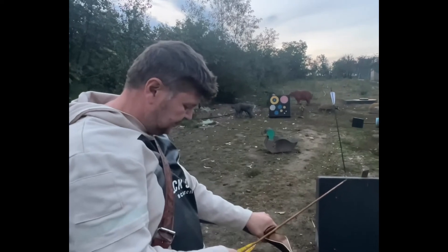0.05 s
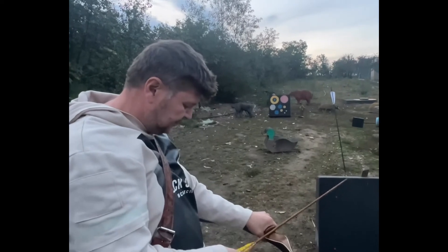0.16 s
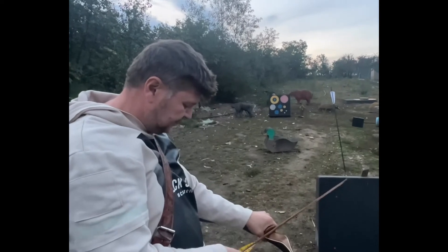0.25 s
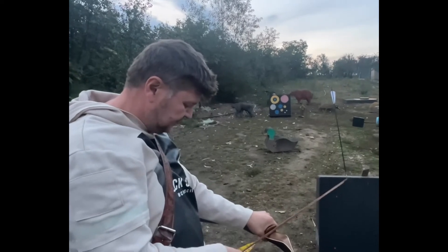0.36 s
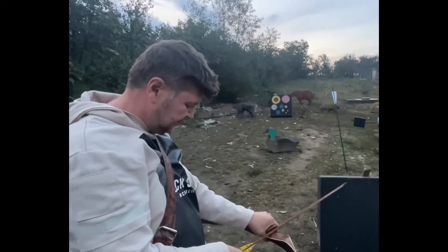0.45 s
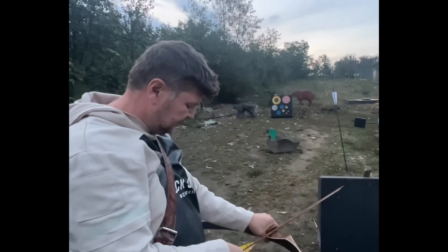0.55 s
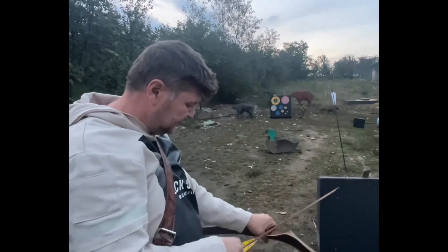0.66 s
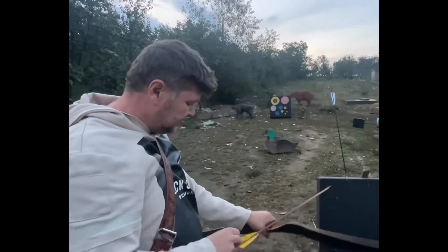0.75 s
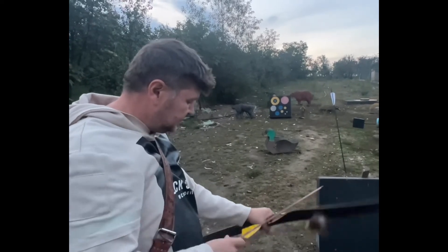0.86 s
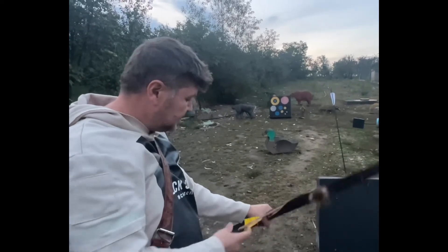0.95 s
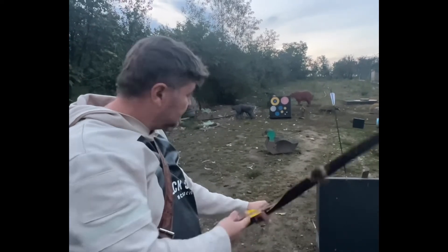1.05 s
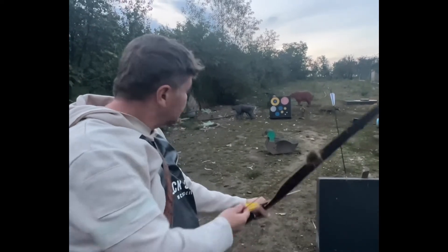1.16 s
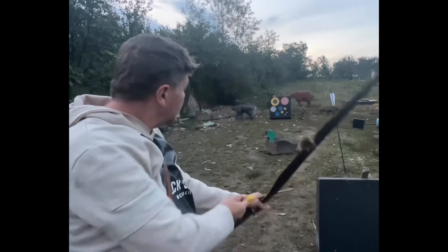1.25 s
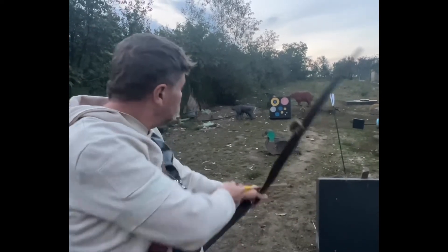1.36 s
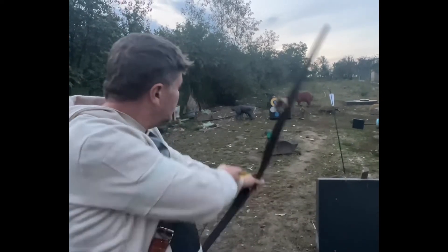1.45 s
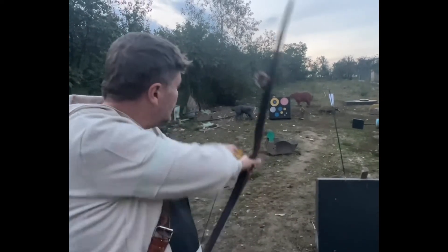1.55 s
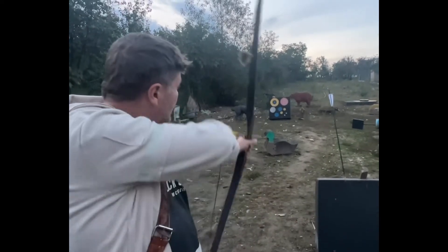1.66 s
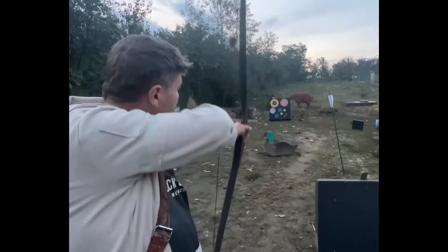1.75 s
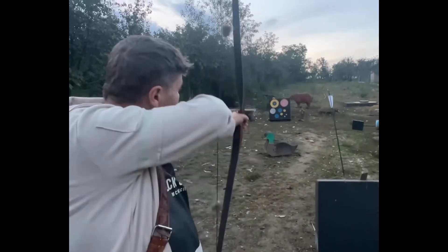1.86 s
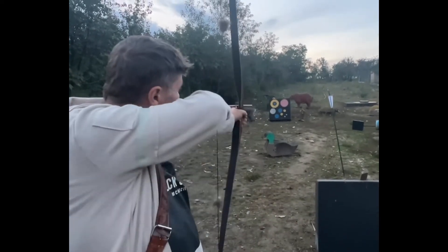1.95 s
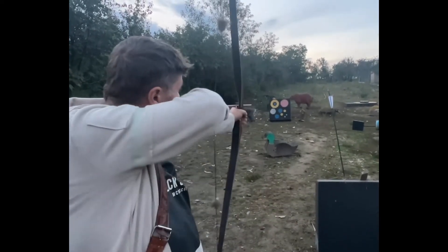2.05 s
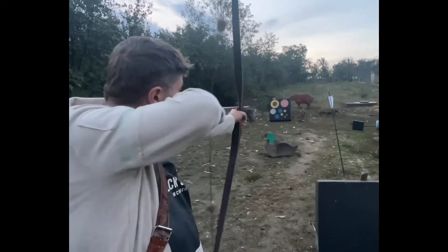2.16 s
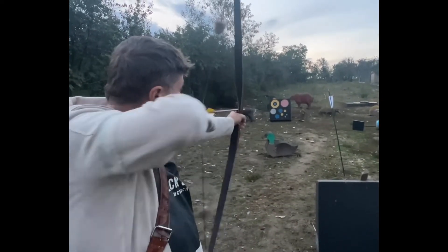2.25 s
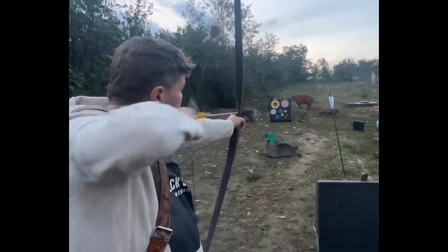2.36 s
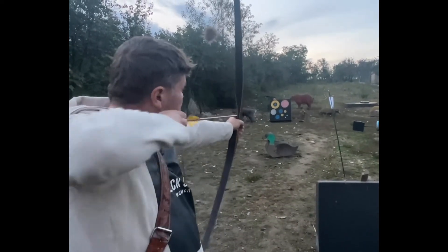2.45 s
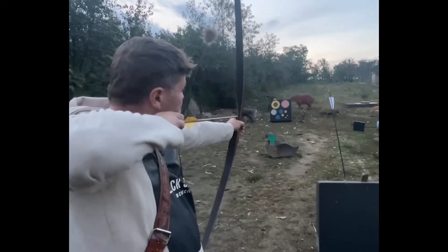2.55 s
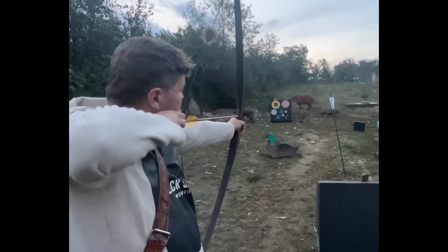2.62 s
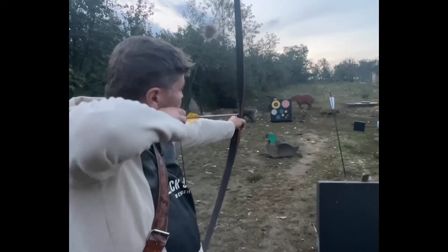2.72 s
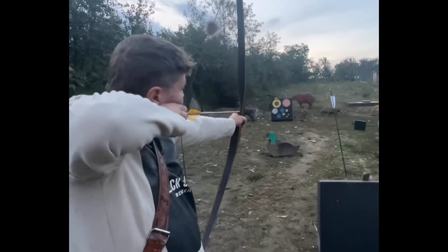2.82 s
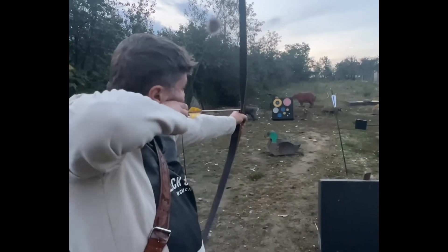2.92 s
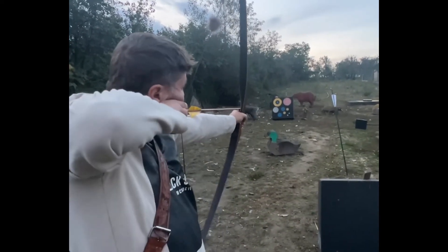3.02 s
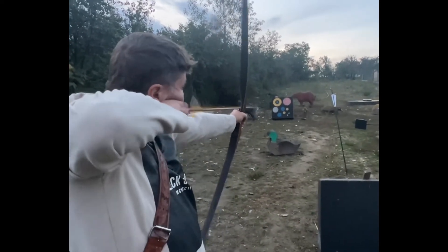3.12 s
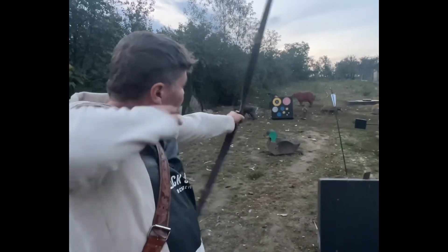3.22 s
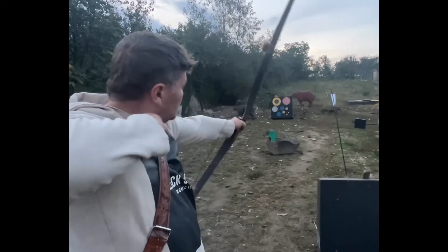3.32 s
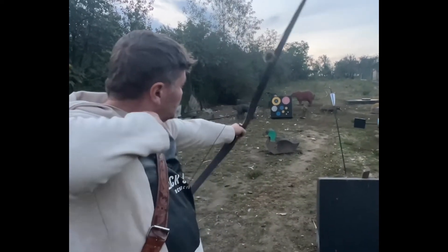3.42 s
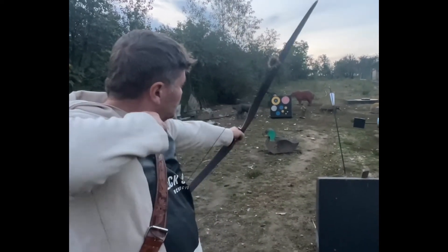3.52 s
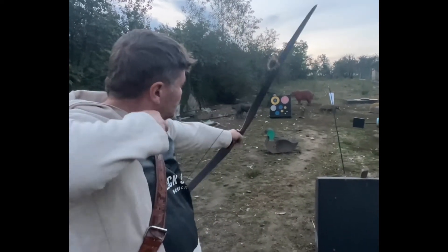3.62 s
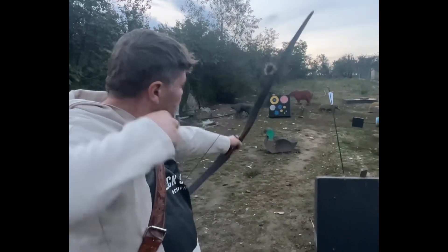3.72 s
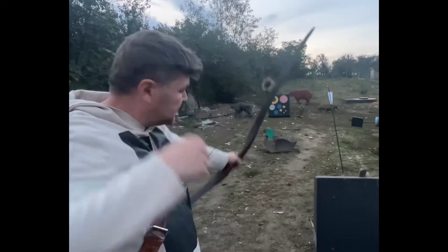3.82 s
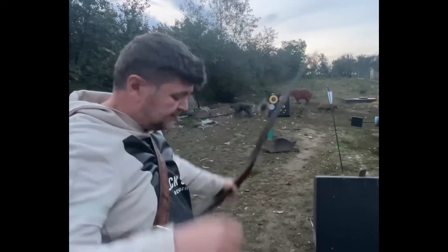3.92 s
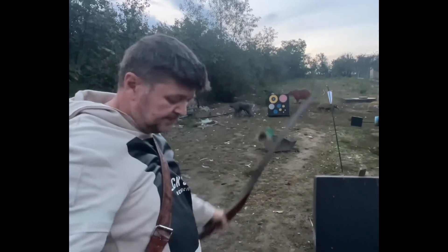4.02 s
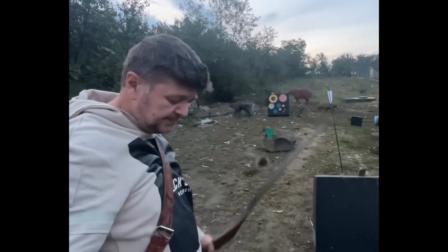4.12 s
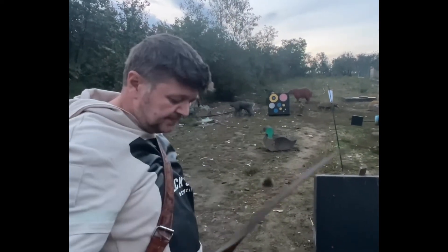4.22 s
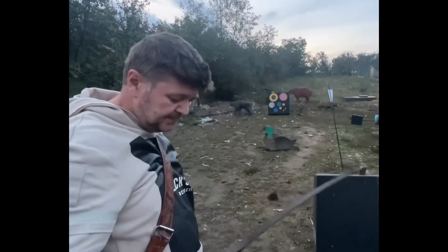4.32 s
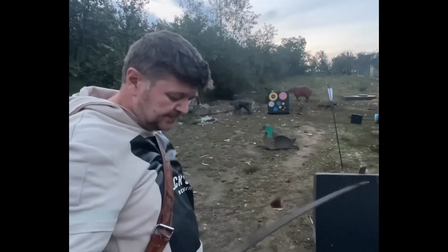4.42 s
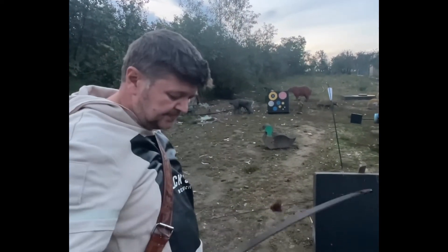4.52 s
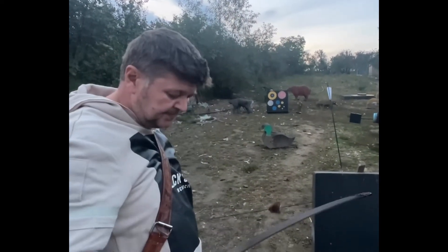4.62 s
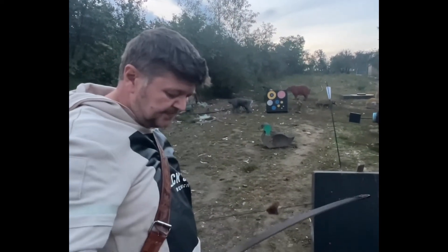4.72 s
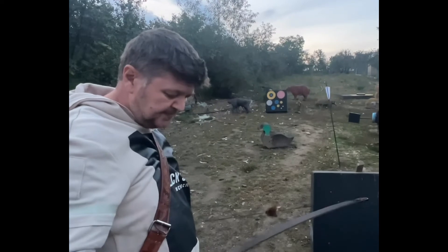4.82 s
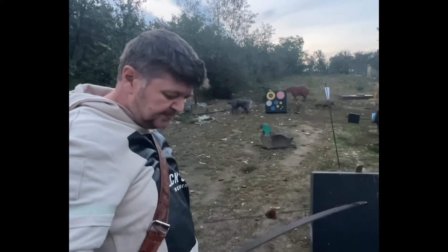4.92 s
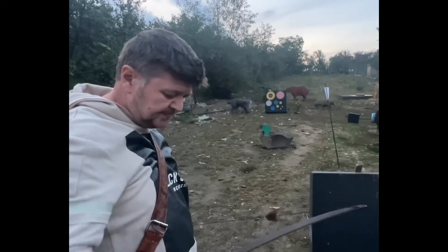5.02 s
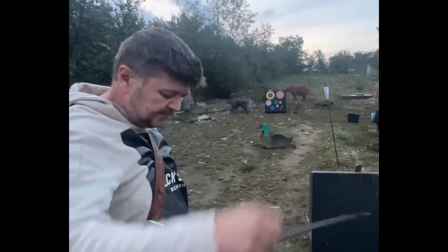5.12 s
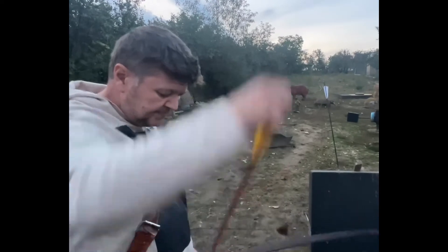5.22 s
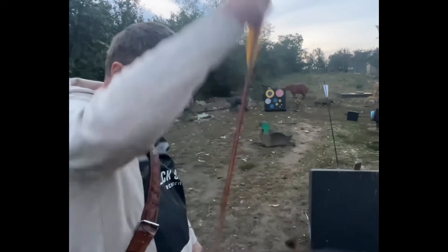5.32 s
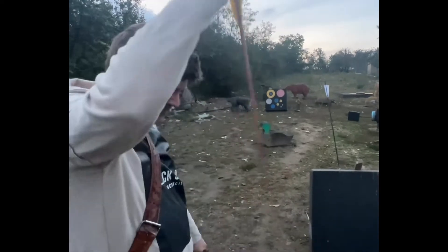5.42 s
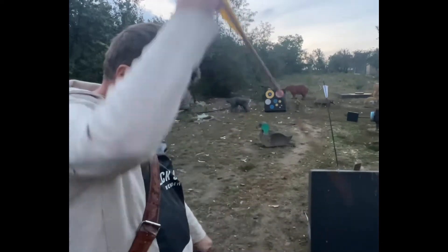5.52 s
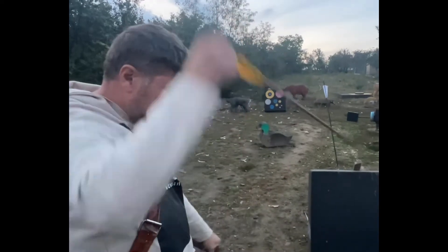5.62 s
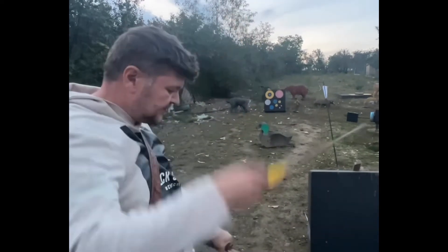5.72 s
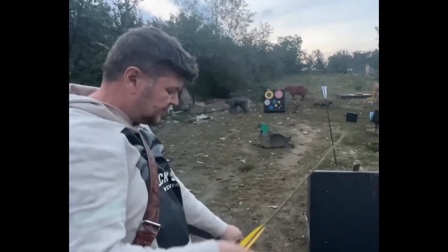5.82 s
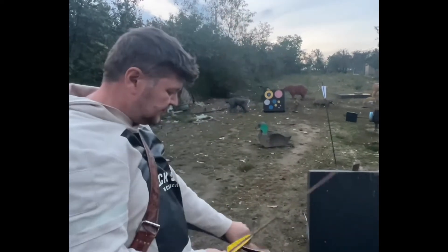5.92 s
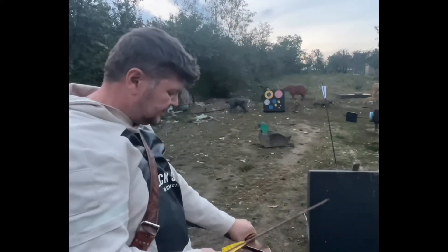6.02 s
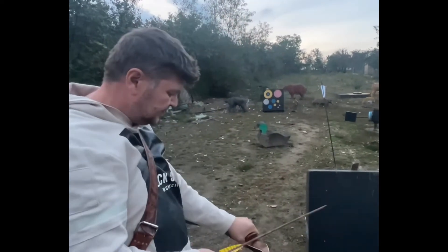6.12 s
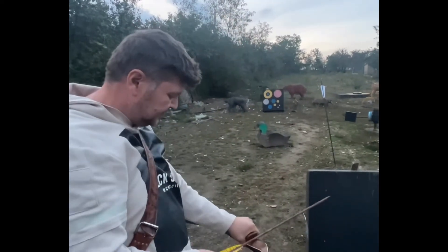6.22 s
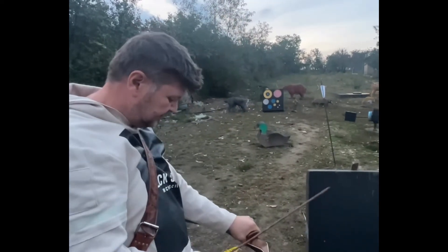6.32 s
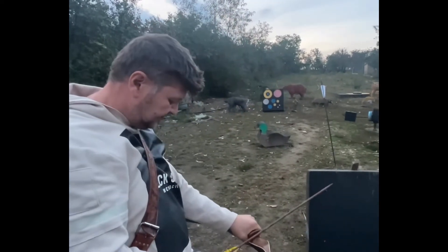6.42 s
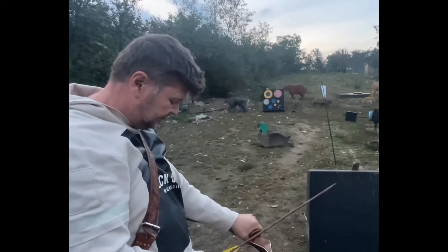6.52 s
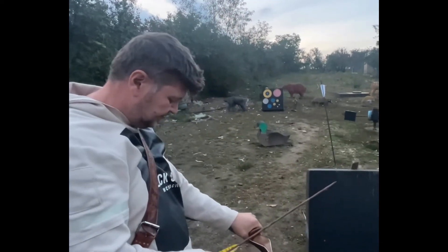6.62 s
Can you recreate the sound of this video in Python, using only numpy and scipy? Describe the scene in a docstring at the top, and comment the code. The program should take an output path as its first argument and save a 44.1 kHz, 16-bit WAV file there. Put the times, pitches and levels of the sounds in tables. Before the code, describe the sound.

One close bow shot twangs and the arrow smacks into a rattling target, then arrows clatter and scrape in a quiver.

```python
"""An open archery range at dusk, heard from just behind an archer who shoots one arrow.
The bed is rumbling wind, a far road, trilling crickets and a few faint hoots. Up close, shafts knock,
slide and jostle in the quiver. The string whistles through the air and stops with a jolt that rings
through the bow; a fifth of a second later the arrow slaps into the target and rattles its face."""
import sys
import numpy as np
from scipy import signal
from scipy.fft import rfft, irfft, next_fast_len
from scipy.io import wavfile

SR = 44100
rng = np.random.default_rng(int(sys.argv[2]) if len(sys.argv) > 2 else 0)


def store_wav(level_fs):
    """Save 16-bit WAV to argv[1]."""
    pcm = np.round(np.clip(np.atleast_2d(level_fs), -1, 1) * 32767)
    wavfile.write(sys.argv[1], SR, pcm.T.astype(np.int16))


N = 294144

# fader rides of the bed: (time [s], wind level [dB], road level [dB])
BED_LEVELS = [(0, -58.5, -58.5), (.5, -55.5, -59), (.85, -59, -58), (2.9, -61.5, -58), (4.5, -63.5, -56.5),
              (4.8, -57.5, -58), (5.0, -62, -58), (5.45, -62.5, -58), (5.56, -72.5, -60), (6.67, -75, -62)]
# stereo width of the bed: (frequency [Hz], left-right likeness [0-1])
BED_LIKENESS = [(60, 0.96), (200, 0.57), (400, 0.017), (15000, 0.13)]
# balance of the bed and of the foreground: (frequency [Hz], left minus right [dB])
BED_PAN = [(60, -1.5), (110, -2), (200, -5.5), (380, -4), (700, -0.5), (1290, 7.5), (2380, 9), (4400, 2),
           (8120, 11.5), (15000, -11)]
NEAR_PAN = [(80, 3.5), (200, -3), (400, -10.5), (1300, -3), (2400, -5.5), (4400, 2.5), (8000, -2)]
# phase on top of the left-right lag, at aside = 1: (frequency [Hz], left lead [rad])
LEFT_LEAD = [(40, -0.5), (125, 0.7), (250, 0.46), (500, 1.8), (1000, -0.6), (2000, 1.42), (3250, -1),
             (3800, 1.6), (6500, 3.4), (8000, 6.5), (12000, 8.5)]
# the microphone's treble lift: (frequency [Hz], gain [dB])
MIC_EQ = [(3000, -1.24), (8000, 6), (12000, 5.5), (15000, -5.5)]

# tone of each noise layer: (frequency [Hz], relative level [dB])
WIND_EQ = [(15, -30), (25, -24), (49, 3), (123, 0), (172, -8.5), (343, -15), (404, -11.5), (500, -24.5),
           (650, -30.5), (1100, -120)]
ROAD_EQ = [(88, -32), (150, 5.5), (165, -16), (234, -6.5), (556, -2.5), (883, -2), (991, -0.5), (1050, 2.5),
           (1270, 0.5), (1910, 6), (4460, -24.5), (7080, -21), (7640, -17), (8750, -34.5), (10800, -43.5),
           (12200, -29), (13500, -50)]
SCRAPE_EQ = [(2200, 0), (3200, -0.5), (4000, -0.5), (5000, -1), (6200, -7), (8500, -10), (10500, -18.5),
             (15000, -21)]  # shaft on shaft
HOLLOW_EQ = [(700, -6.5), (900, -2.5), (1100, -1), (1320, 3), (1500, 1.5), (1780, -8), (2100, 0),
             (2600, -6), (3000, -28), (3300, -30), (3700, -14)]  # scraping inside the quiver
CLOTH_EQ = [(150, -10), (280, -4), (500, -12), (850, -5)]
CRACK_EQ = [(150, -45), (500, -11.5), (1200, 13.5), (3000, 22), (5500, 19.5), (7000, 4.5), (9000, 1.5),
            (12000, -12), (15500, -28.5)]  # any hard contact
RATTLE_EQ = [(900, -21), (2450, 0), (5000, -4), (7400, -3.5), (10000, -11), (13000, -17), (15500, -4)]  # the target face
DISTANT_EQ = [(600, 1.5), (1500, 10), (3000, 3.5), (5500, -1), (9000, -15), (12000, -25.5)]  # dulled by distance
RUSH_EQ = [(300, 1.5), (650, 0.5), (1000, -3.5), (1400, -2.5), (2500, -5), (4000, -19), (6000, -26.5),
           (9000, -24), (13000, -32), (16000, -14)]  # the string cutting the air
WAKE_EQ = [(600, 3), (1500, 12.5), (3000, 3), (5500, -5.5), (9000, -19.5), (13000, -20), (16000, -1.5)]  # the air it leaves stirred
SHIVER_EQ = [(45, -14.5), (75, 6), (110, -3), (190, -0.5), (320, -9), (480, -18), (750, -19.5), (1050, -22),
             (1400, -33)]  # the bow limbs

# ringing modes of each body: (frequency [Hz], level [dB], t60 [s])
SHAFT_MODES = [(177, -14.5, 0.077), (308, -10, 0.059), (630, -8.5, 0.023), (1143, 7, 0.11),
               (1730, 8.5, 0.012), (2180, -1.5, 0.067), (3120, -4, 0.02), (5500, 3, 0.027), (7850, 8, .015)]
QUIVER_MODES = [(575, -10.5, 0.02), (894, 0, 0.05), (1066, 5, 0.047), (1330, 4.5, 0.027), (1762, 3, 0.097),
                (2230, -18, 0.044), (2625, -4.5, 0.055), (3260, 5.5, 0.037), (5130, -11, 0.028),
                (5870, -3.5, 0.029), (8200, -18, 0.018)]
TARGET_MODES = [(112.8, -6.5, 0.089), (260, -7, 0.089), (689, -11.5, 0.062), (1066, -1.5, 0.059),
                (2870, -6.5, 0.03), (3660, 0, 0.021), (4300, -4.5, 0.016), (5800, 2.5, 0.017),
                (7300, -3, .018)]
BOW_MODES = [(104, 3.4, 0.078), (228, 2.5, 0.15), (79, -2.5, 0.13), (141.7, -8, .07), (465, -14.5, .1),
             (294, -10.5, 0.26), (370.5, -12.5, 0.22), (526.5, -14, 0.11), (645, -15.5, 0.08),
             (769, -13, .06), (1065, -4, 0.056), (1210, -15, 0.027), (1454, -17, .06), (2466, -2, 0.02),
             (3440, -28.5, 0.024)]
# impacts: (time [s], crack level [dB], crack t60 [s], tilt [dB/octave], ring level [dB], contact [ms])
SHAFT_KNOCKS = [(.338, -41.5, 0.0078, -17, -51, 0.95), (.341, -70, 0.01, -8, -28.5, 5.3),
                (0.4705, -38, 0.023, 15.5, -57, 0.45), (0.4735, -38, 0.019, -2.5, -57, 0.2),
                (0.477, -46.5, 0.099, -12, -38.5, 0.88), (0.481, -59, 0.095, 12, -28, 4.3),
                (.578, -67.5, 0.099, 7, -73, 0.22), (.929, -76, .03, 4, -64.5, 0.27),
                (4.194, -52.5, 0.049, -7, -68, 0.22), (4.35, -62, 0.046, -8, -70, 0.25),
                (4.530, -51.5, 0.012, 2, -59, 0.11), (4.586, -52.5, 0.044, 11, -62, 0.081),
                (4.5895, -34.5, 0.01, 7, -33, 1.24), (4.594, -52, 0.044, 6, -46, 0.24),
                (4.698, -54, .03, -24, -28, 4.3), (5.324, -27.5, 0.03, 1.5, -51, 0.055),
                (5.333, -37.5, 0.11, -13.5, -46, 0.1), (5.341, -34, 0.056, -4.5, -60, 0.37),
                (5.3435, -25.5, 0.018, -3.5, -52, 0.4), (5.497, -52, 0.042, 8, -69.5, 0.22),
                (6.099, -39.5, 0.045, -3, -55, 0.18), (6.103, -59, 0.04, -4, -46.5, 0.75),
                (6.211, -48, 0.013, -11, -69, 0.26), (6.219, -57, 0.034, -10, -71, 0.22),
                (6.358, -55.5, 0.038, -12, -61, 0.17)]  # shafts on the bow and on each other
QUIVER_JOSTLES = [(4.946, -48, 0.059, 0, -72, .1), (5.028, -37, 0.05, -4, -68, .1),
                  (5.072, -39.5, 0.082, 1, -51, .1), (5.09, -56, .03, 2, -64, .4),
                  (5.113, -56, .03, 0, -55, 0.33), (5.129, -40, 0.026, 6, -61, .1),
                  (5.155, -44, .03, 1, -49, .2), (5.161, -29.5, 0.035, -6.5, -40, .1),
                  (5.203, -47, .03, 8, -59, .1), (5.218, -51, 0.036, 7, -53, .1),
                  (5.236, -37, 0.051, -16, -46.5, .2), (5.266, -41, 0.066, -10.5, -45.5, .2)]
TARGET_HITS = [(3.337, -49, 0.12, 10, -68, .2), (3.3512, -24, 0.015, -0.5, -32.5, 0.12),
               (3.356, -34.5, 0.056, -11, -17.5, 1.2), (3.370, -32, 0.028, 15, -37, .05),
               (3.379, -41, 0.13, 17, -36, .1), (3.416, -56, 0.037, 3, -44, .3)]  # the arrow lands, then whips
STRING_JOLTS = [(3.138, -32, .025, -10.5, -25, .4), (3.1405, -42.5, 0.031, 15.5, -29.5, 2.0),
                (3.145, -48, 0.018, -5, -15, 1.21), (3.151, -45, 0.019, 1, -31, .2),
                (3.1575, -25.5, 0.006, 20.5, -33, .1), (3.1655, -29, 0.0055, 1, -29, .1),
                (3.172, -33.5, 0.0067, 12, -38, .1), (3.24, -48.5, .03, -7.5, -77, .1)]  # the string stops and rebounds

# faint far hoots: (time [s], length [s], pitch [Hz], width [Hz], level [dB])
HOOT_CALLS = [(0.884, 0.046, 958, 15, -64), (0.916, 0.06, 520.5, 14, -56), (0.989, 0.048, 529, 18, -58),
              (1.041, 0.065, 517, 13, -61), (1.15, 0.18, 1468, 69, -58.5), (1.482, 0.23, 1394, 150, -59.5)]
# shafts, feathers and sleeve sliding:
# (time [s], length [s], scrape [dB], hollow [dB], rasp [dB], cloth [dB], rasp pitch [Hz])
SLIDE_STROKES = [(0.085, 0.059, -56.5, -57, -55, -87, 3500), (1.11, 0.17, -73, -61, -75, -66.5, 4970),
                 (2.098, 0.16, -68.5, -65.5, -72, -85, 5500), (2.218, 0.095, -69, -64, -65.5, -91, 4900),
                 (2.278, 0.2, -70, -59.5, -75, -69, 4900), (4.171, 0.085, -65, -67, -79, -64.5, 5030),
                 (4.242, 0.1, -71.5, -66, -79, -80, 5000), (4.34, 0.068, -61, -69, -70, -71, 4970),
                 (4.4, 0.18, -66.5, -59.5, -70, -64, 4970), (4.701, 0.18, -52.5, -52.5, -50.5, -51.5, 5020),
                 (4.83, 0.15, -63, -67, -73, -68, 5040), (4.933, 0.061, -49.5, -64, -63, -85, 5000),
                 (4.956, 0.074, -52.5, -57.5, -68, -87, 8570), (5.007, 0.073, -56, -57, -54, -67, 3170),
                 (5.044, 0.081, -55, -58, -55, -74, 5400), (5.068, 0.044, -62, -62, -50, -71, 3270),
                 (5.08, 0.056, -58, -59, -49.5, -74, 1290), (5.107, 0.064, -59, -54, -48, -71, 1337),
                 (5.122, 0.022, -65, -58, -56, -80, 8540), (5.174, 0.051, -55.5, -51, -65, -53, 1100),
                 (5.199, 0.091, -51, -52.5, -57, -60, 5500), (5.238, 0.063, -56, -54, -64, -64, 3730),
                 (5.259, 0.042, -53.5, -56, -60, -66, 4800), (5.293, 0.036, -50, -64, -60, -67, 5850),
                 (5.333, 0.14, -69, -66, -76, -80, 5000), (5.445, 0.16, -64.5, -62, -84, -83, 5030),
                 (6.339, 0.11, -65.5, -89, -90, -84, 5000)]
# puffs of string whistle: (centre time [s], length [s], pitch [Hz], level [dB])
WHISTLE_PUFFS = [(3.131, 0.0069, 2500, -22.5), (3.137, 0.0065, 3010, -14.5), (3.145, 0.004, 3230, -19),
                 (3.149, 0.0084, 2440, -22)]
# string overtones: (time [s], settled pitch [Hz], level [dB], t60 [s], starts flat by [fraction])
STRING_OVERTONES = [(3.149, 1640, -13, 0.083, 0.051), (3.159, 1665, -18, 0.11, 0.011),
                    (3.165, 3480, -42.5, .2, 0.0089), (3.163, 1165, -29.5, 0.25, .01),
                    (3.168, 904, -37.5, .3, .01), (3.156, 705, -26.5, 0.12, 0.03),
                    (3.158, 510, -32, 0.15, 0.02), (3.167, 292, -27, 0.17, 0.11)]
# swells of string hum: (time [s], length [s], level [dB])
HUM_SWELLS = [(3.165, 0.085, -37.5), (3.242, 0.12, -40.5), (3.4, 0.05, -54.5), (3.446, 0.065, -52)]


def from_db(db):
    """Decibels to gain."""
    return 10 ** (np.asarray(db) / 20)


def rms_one(x):
    """Normalise to rms 1."""
    return x / np.sqrt(np.mean(x ** 2) + 1e-20)


def at_hz(curve, hz):
    """Read a curve on a log-frequency axis."""
    points_hz, values = np.transpose(curve)
    return np.interp(np.log(hz + 1), np.log(points_hz), values)


def drift(rate_hz):
    """Smooth random modulation, rms about 1."""
    step, run_in = 40, 2000
    pole = np.exp(-2 * np.pi * rate_hz * step / SR)
    noise = rng.standard_normal(N // step + run_in + 2)
    slow = signal.lfilter([1], [1, -2 * pole, pole * pole], noise)[run_in:]
    return np.interp(np.arange(N) / step, np.arange(len(slow)), rms_one(slow))


def swell(start, length, sharp):
    """A smooth fade in and out."""
    return np.sin(np.pi * np.clip((np.arange(N) / SR - start) / length, 0, 1)) ** sharp


def envelope(start, top_db, fall_db_per_s, rise_s=0, start_db=0, hold_s=0):
    """Attack, hold and decay, each a straight line in dB."""
    t = np.arange(N) / SR - start
    attack_db = np.interp(t, [0, rise_s], [start_db, top_db])
    return from_db(attack_db - fall_db_per_s * np.maximum(t - rise_s - hold_s, 0)) * (t >= 0)


def coloured(x, eq):
    """EQ a noise, with steep skirts at both ends; rms 1."""
    size = next_fast_len(N)
    hz = np.fft.rfftfreq(size, 1 / SR)
    skirted = [(eq[0][0] / 2, eq[0][1] - 40), *eq, (eq[-1][0] * 2, eq[-1][1] - 60)]
    return rms_one(irfft(rfft(x, size) * from_db(at_hz(skirted, hz)), size)[..., :N])


def narrow(x, hz, width_hz):
    """Two passes through a resonant band-pass; rms 1."""
    radius = np.exp(-np.pi * width_hz / SR)
    for _ in range(2):
        x = signal.lfilter([1, 0, -1], [1, -2 * radius * np.cos(2 * np.pi * hz / SR), radius ** 2], x)
    return rms_one(x)


def grit(per_s, spread_db=0):
    """A texture of dense, uneven clicks."""
    sizes = from_db(spread_db * np.minimum(rng.exponential(1, N), 5)) * rng.standard_normal(N)
    return sizes * (rng.random(N) < per_s / SR)


def wide_grit(per_s, spread_db=0):
    """Centred grit plus louder grit of each channel's own."""
    centre, left, right = (grit(per_s, spread_db) for _ in range(3))
    return centre + from_db(4.5) * np.array([left, right])


def wide_noise(eq, patchy_db):
    """Stereo noise with the bed's width and balance; its level wanders."""
    hz = np.fft.rfftfreq(N, 1 / SR)
    likeness, pan = at_hz(BED_LIKENESS, hz), from_db(at_hz(BED_PAN, hz) / 2)
    mid = np.sqrt(1 + likeness) * rfft(coloured(rng.standard_normal(N), eq))
    side = np.sqrt(1 - likeness) * rfft(coloured(rng.standard_normal(N), eq))
    pair = irfft([(mid + side) * pan, (mid - side) / pan], N)
    return from_db(patchy_db * drift(7)) * pair / np.std(pair.mean(axis=0))


def wind_and_road():
    """Low wind rumble and far traffic hum, each on its own fader."""
    times, *faders = np.transpose(BED_LEVELS)
    wind, road = (from_db(np.interp(np.arange(N) / SR, times, db)) for db in faders)
    return wind * wide_noise(WIND_EQ, patchy_db=1.5) + road * wide_noise(ROAD_EQ, patchy_db=1)


def crickets():
    """A thin trill on the left: fast pulses of noise through a high resonance."""
    pulses_per_s = 120 * (1 + 0.0914 * drift(12.8))
    pulses = np.sin(np.pi * np.cumsum(pulses_per_s) / SR) ** 2
    trill = narrow(pulses * rng.standard_normal(N), hz=7666, width_hz=200)
    return trill * from_db(-84 + 1.08 * drift(8.4)) * from_db([[10.5], [-10.5]])


def hoots():
    """Wavering tones with a breathy edge; the wider, the rougher."""
    out = 0
    for start, length, hz, width_hz, db in HOOT_CALLS:
        tone = np.sqrt(2) * np.sin(2 * np.pi * np.cumsum(hz + width_hz / 2 * drift(29.7)) / SR)
        breath = from_db(-3.5) * narrow(rng.standard_normal(N), hz, width_hz)
        out += from_db(db) * swell(start, length, sharp=0.48) * (tone + breath)
    return out


def placed(x, scatter_db, aside):
    """Further aside, the left channel leads more; ground, body and gear scatter the treble."""
    size, lag_s, scatter_t60 = next_fast_len(N), 0.00014, 0.031
    hz, t = np.fft.rfftfreq(size, 1 / SR), np.arange(8192) / SR
    lead = aside * (2 * np.pi * hz * lag_s + at_hz(LEFT_LEAD, hz))
    pan = from_db(at_hz(NEAR_PAN, hz) / 2) * np.exp(0.5j * lead)
    tail = rng.standard_normal((2, len(t))) * from_db(-60 * t / scatter_t60)
    tail /= np.linalg.norm(tail, axis=1, keepdims=True)
    scatter = from_db(scatter_db) * rfft(tail, size) * hz / (hz + 2500)
    return irfft(rfft(x, size) * [pan, 1 / pan] * (1 + scatter), size)[:, :N]


def cracks(blows, rise_s):
    """The transient of each contact: a tick at the peak of a fast-dying noise burst."""
    out, t = np.zeros(N), np.arange(4096) / SR
    hz = np.fft.rfftfreq(len(t), 1 / SR)
    for start, db, t60, tilt_db, _, _ in blows:
        colour = from_db(at_hz(CRACK_EQ, hz) + tilt_db * np.log2((hz + 100) / 3000))
        burst = rms_one(irfft(rfft(rng.standard_normal(len(t))) * colour))
        tick = irfft(1j * colour * np.exp(-2j * np.pi * hz * rise_s))
        tick *= from_db(6) / np.max(np.abs(tick))
        gain = from_db(db - 60 * t / t60) * np.minimum(t / rise_s, 1)
        out[round(start * SR):][:len(t)] += gain * (burst + tick)
    return out


def knocked(blows, modes, uneven_db, rise_s=0.000443):
    """Each blow cracks, then rings the body's modes unevenly; longer contact gives a duller ring."""
    out, t = cracks(blows, rise_s), np.arange(SR // 4) / SR
    for start, *_, ring_db, contact_ms in blows:
        ring = 0
        for k, (hz, db, t60) in enumerate(modes):
            decay = from_db(db + uneven_db * rng.standard_normal() - 60 * t / t60)
            ring += (-1) ** k * decay * np.sin(2 * np.pi * hz * t)
        push = np.hanning(max(round(contact_ms * SR / 1000), 1) + 2)
        onset = round((start + rise_s) * SR)
        body = np.convolve(ring, push / push.sum())[:N - onset]
        out[onset:][:len(body)] += from_db(ring_db) * body
    return out


def rubbed(modes, per_s):
    """Friction: each mode is rung by its own sparse grit; rms 1."""
    return rms_one(sum(from_db(db) * narrow(grit(per_s, spread_db=2), hz, 10 / t60)
                       for hz, db, t60 in modes))


def slides():
    """Sliding foley: bright scrape at the contact, hollow quiver, pitched rasp and a thud of cloth."""
    scrape = coloured(wide_grit(1800, spread_db=2.5), SCRAPE_EQ)
    hollow = coloured(wide_grit(3500, spread_db=1.4), HOLLOW_EQ)
    friction = wide_grit(5000, spread_db=1)
    cloth = coloured(grit(1500, spread_db=2.5), CLOTH_EQ)
    hollow += from_db(-3.5) * rubbed(QUIVER_MODES, per_s=150)
    out = np.zeros((2, N))
    for start, length, scrape_db, hollow_db, rasp_db, cloth_db, rasp_hz in SLIDE_STROKES:
        span = slice(round(start * SR), round((start + 1.2 * length) * SR))  # a fifth extra to release
        progress = np.linspace(0, 1.2, span.stop - span.start)
        gain = from_db(np.interp(progress, [0, 0.32, 1, 1.2], [-20, 0, -10, -40]))
        rasp = narrow(friction[:, span], rasp_hz, width_hz=rasp_hz / 11.4)
        out[:, span] += gain * (from_db(scrape_db) * scrape[:, span] + from_db(rasp_db) * rasp
                                + from_db(hollow_db) * hollow[:, span] + from_db(cloth_db) * cloth[span])
    return out * from_db(1.3 * drift(21))


def handling():
    """Knocks ring a shaft; softer-edged jostles ring the quiver."""
    return (knocked(SHAFT_KNOCKS, SHAFT_MODES, uneven_db=1)
            + knocked(QUIVER_JOSTLES, QUIVER_MODES, uneven_db=3.5, rise_s=0.0099))


def target():
    """The arrow slaps home, the face rattles and the bushes give a fainter, duller answer."""
    shake = envelope(3.352, top_db=-42.5, fall_db_per_s=193, rise_s=0.019, start_db=-40)
    rattle = coloured(wide_grit(3000), RATTLE_EQ)
    rattle += from_db(-5.5) * rubbed(TARGET_MODES[4:], per_s=280)  # upper modes only
    slap = knocked(TARGET_HITS, TARGET_MODES, uneven_db=3)
    bushes = coloured(rng.standard_normal((2, N)), DISTANT_EQ)
    return slap + shake * rattle + envelope(3.371, top_db=-54.5, fall_db_per_s=67) * bushes


def string_whoosh(loose_s, stop_s):
    """Air rushes as the string drives forward; its stirred wake lingers after the stop."""
    travel_s = stop_s - loose_s
    rush = envelope(loose_s, top_db=-25.5, fall_db_per_s=399, rise_s=travel_s, start_db=-41)
    wake = envelope(loose_s, top_db=-35, fall_db_per_s=300.5, rise_s=travel_s, start_db=-39,
                    hold_s=0.0163)
    return rush * coloured(grit(17000), RUSH_EQ) + wake * coloured(grit(11000, spread_db=-1), WAKE_EQ)


def string_whistle():
    """Vortices shed from the string; each puff glides up as the string speeds up."""
    out, glide_hz_per_s = 0, 60000
    for centre, length, hz, db in WHISTLE_PUFFS:
        t = np.arange(N) / SR - centre
        phase = 2 * np.pi * (hz * t + glide_hz_per_s * t ** 2 / 2)
        tone = np.sin(phase) + from_db(-22.5) * np.sin(2 * phase)
        out += from_db(db) * swell(centre - length / 2, length, sharp=3.6) * tone
    return out


def string_hum():
    """The string's low, slightly wavering note comes in swells."""
    pitch_hz = 268.4 + 1.5 * drift(24)
    tone = np.sqrt(2) * np.sin(2 * np.pi * np.cumsum(pitch_hz) / SR)
    return tone * sum(from_db(db) * swell(start, length, sharp=1) for start, length, db in HUM_SWELLS)


def string_twang():
    """Each overtone swells in, climbs to pitch as the string tightens, flutters and dies."""
    out, t = np.zeros(N), np.arange(SR // 2) / SR
    tighten_s, attack_s = 0.011, 0.0093
    for start, hz, db, t60, flat in STRING_OVERTONES:
        phase = 2 * np.pi * hz * (t - flat * tighten_s * (1 - np.exp(-t / tighten_s)))
        flutter_db = drift(46)[:len(t)]
        gain = from_db(db - 60 * t / t60 + flutter_db) * np.minimum(t / attack_s, 1)
        out[round(start * SR):][:len(t)] += gain * np.sin(phase)
    return out


def bow_shot():
    """The string whips forward and stops; the limbs ring and shiver; a dull echo fades over the range."""
    loose_s, stop_s = 3.118, 3.142
    far_noise = coloured(rng.standard_normal((2, N)), DISTANT_EQ)
    echo = far_noise * envelope(stop_s, top_db=-55, fall_db_per_s=34.5)
    string = string_whoosh(loose_s, stop_s) + string_whistle() + string_hum()
    rumble = coloured(rng.standard_normal(N), SHIVER_EQ)
    shiver = rumble * envelope(stop_s, top_db=-32.5, fall_db_per_s=74, rise_s=0.019, start_db=-67.5)
    return echo + string + shiver + string_twang() + knocked(STRING_JOLTS, BOW_MODES, uneven_db=2)


def scene():
    """The mix: the dusk bed, with shot, hit and foley placed in front."""
    bed = crickets() + wind_and_road() + hoots()
    return (bed + placed(bow_shot(), scatter_db=-3, aside=0.88)
            + placed(target(), scatter_db=-5.5, aside=0.27)
            + placed(handling(), scatter_db=3.5, aside=0.65)
            + placed(slides(), scatter_db=-24, aside=0.89))


def record(dry):
    """The microphone lifts the treble, rolls off the deepest bass and cuts the very top."""
    lifted = irfft(rfft(dry) * from_db(at_hz(MIC_EQ, np.fft.rfftfreq(N, 1 / SR))), N)
    low_cut = signal.butter(4, 50, "high", fs=SR, output="sos")
    high_cut = signal.cheby2(16, 70, 16400, fs=SR, output="sos")
    return signal.sosfilt(high_cut, signal.sosfilt(low_cut, lifted))


dry = scene()
out = record(dry)
store_wav(out)
```